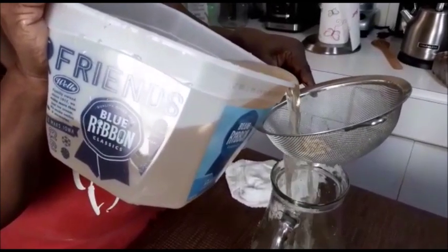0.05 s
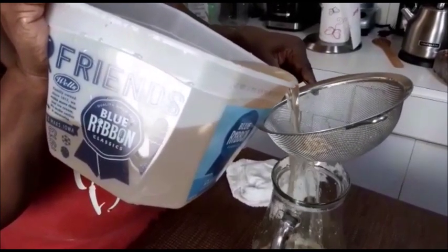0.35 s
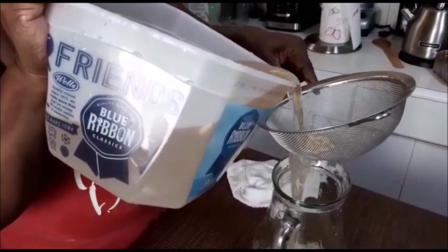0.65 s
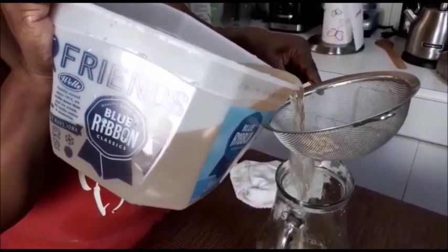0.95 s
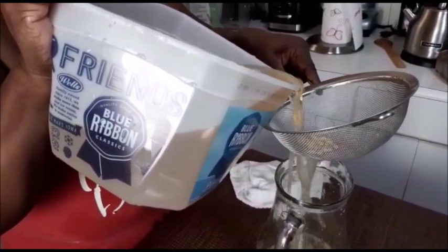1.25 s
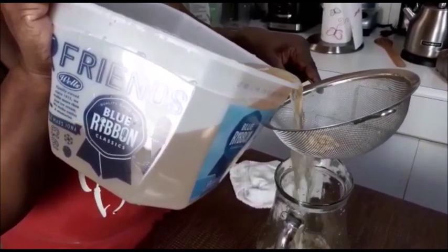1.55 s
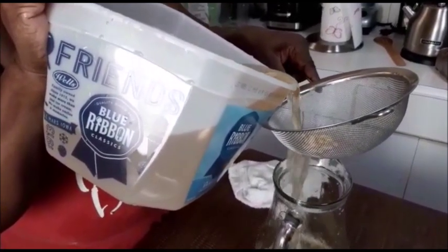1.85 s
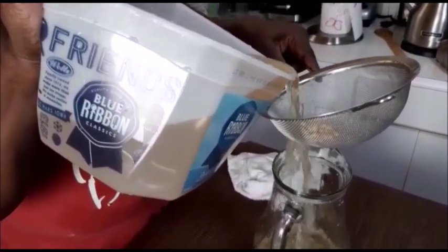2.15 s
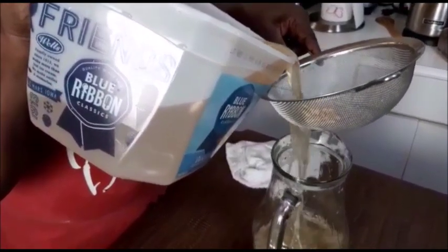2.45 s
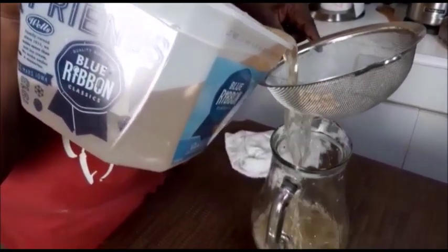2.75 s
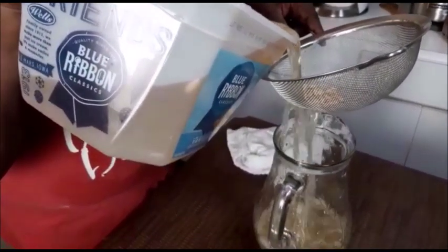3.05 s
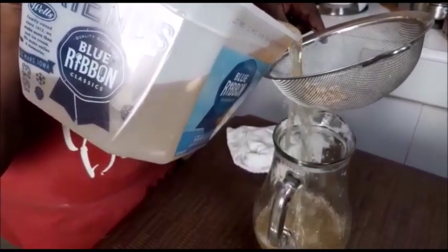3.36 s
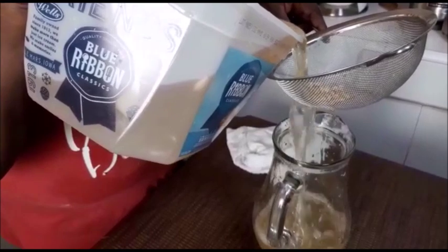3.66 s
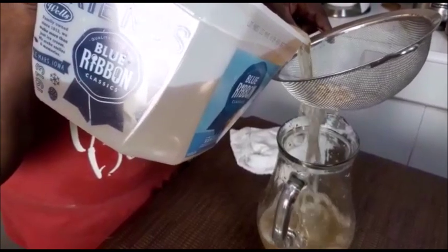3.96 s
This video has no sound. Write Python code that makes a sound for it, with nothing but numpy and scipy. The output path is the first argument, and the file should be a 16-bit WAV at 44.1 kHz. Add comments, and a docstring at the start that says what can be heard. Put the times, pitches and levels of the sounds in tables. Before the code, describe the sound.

Liquid pours through a wire strainer, splashing and gurgling into a glass pitcher.

```python
"""A drink is poured through a wire strainer into a glass pitcher in a quiet kitchen.
From the start, the uneven stream plunges into the pool: trapped air gulps, bubbles plop and fizz,
and spray spatters on the glass. After about a second the gulps thin out, then the loudest comes
near 1.8 s. They keep coming to the end, shorter and rougher, while the air in the pitcher rings
slowly higher as it fills."""
import sys
import numpy as np
from scipy import signal
from scipy.io import wavfile

SR = 44100
rng = np.random.default_rng(int(sys.argv[2]) if len(sys.argv) > 2 else 0)


def to_wav(s):
    """Save 16-bit WAV."""
    ch = np.atleast_2d(s).T  # columns
    pcm = np.round(np.clip(ch, -1, 1) * 32767)  # PCM
    wavfile.write(sys.argv[1], SR, pcm.astype(np.int16))


N = 176400
TIME = np.arange(N) / SR
LOW_NOTE_PAN_DB, HIGH_NOTE_PAN_DB = 4, -5.5  # the pitcher's two notes; plus means left


# The stream traps a pocket of air: t/s, level/dB
AIR_POCKETS = [(0.15, -20), (0.239, -23), (.319, -26), (0.349, -17), (.436, -28), (.483, -22), (0.521, -19),
               (.608, -30), (.726, -17.5), (.835, -26), (1.028, -21.5), (1.076, -20), (1.108, -28),
               (1.537, -28), (1.818, -13.5), (1.879, -22.5), (1.934, -19), (2.081, -26.5), (2.185, -20.5),
               (2.298, -19.5), (2.347, -19.5), (2.396, -25.5), (2.471, -26), (2.652, -20.5), (2.808, -23),
               (2.853, -20.5), (2.946, -28), (3.015, -25.5), (3.05, -23), (3.13, -23), (3.191, -19.5),
               (3.26, -18.5), (3.391, -22.5), (3.499, -23.5), (3.563, -18.5), (3.741, -23.5),
               (3.826, -20.5), (3.872, -27.5)]

def gulps(swell_s=0.057, first_ring_s=0.24):
    """Each air pocket pumps up the pitcher's low note, then lets it ring out."""
    power = from_db(-38.5 + (TIME - TIME.mean())) ** 2  # small pockets keep the note going in between
    for s, db in AIR_POCKETS:
        since_peak = TIME - s - .013
        ring_s = first_ring_s * np.exp(-0.19 * s)  # shorter as the pitcher fills
        fade_db = -60 * np.maximum(-since_peak / swell_s, since_peak / ring_s)
        power = power + from_db(db + .5 + np.maximum(fade_db, -90)) ** 2
    flutter_db = 1.26 + 0.49 * TIME  # rougher as it fills
    hz = note_pitch(*AIR_NOTES[0][:2]) * (1 + .015 * flutter_db * drift(71))
    delay_s = np.array([[.00007], [0]])  # left ear, right ear
    tone = np.sin(2 * np.pi * (np.cumsum(hz) / SR - hz * delay_s))
    return pan(LOW_NOTE_PAN_DB) * np.sqrt(power) * from_db(flutter_db * drift(80)) * tone


# A cluster of bubbles breaks away: t/s, level/dB, f/Hz
BUBBLE_CLUSTERS = [(0.043, -27.5, 2450), (.226, -23.5, 2700), (.243, -22, 537), (.378, -22.5, 1870),
                   (.401, -21.5, 2670), (.452, -27.5, 775), (.582, -26.5, 1780), (.692, -27, 2190),
                   (.708, -24.5, 1970), (.819, -24, 2900), (.91, -25.5, 2390), (.946, -24, 3490),
                   (.969, -24.5, 1870), (1.162, -24, 2410), (1.212, -24, 2860), (1.497, -30, 2100),
                   (1.538, -23, 505), (1.575, -28.5, 570), (2.183, -29.5, 1870), (2.237, -26.5, 2680),
                   (2.248, -24.5, 1530), (2.258, -22.5, 534), (2.308, -28, 1600), (2.358, -25.5, 567),
                   (3.181, -24, 1050), (3.26, -24.5, 1420), (3.362, -22, 640), (3.613, -28, 700),
                   (3.63, -28, 1680), (3.635, -26, 3790), (3.74, -26.5, 1690)]

def plops(count=9, trail_s=.03, spread_octaves=.4):
    """One bubble leads a short trail of weaker ones, ever sparser and less alike in size."""
    out = np.zeros((2, N))
    for s, db, hz in BUBBLE_CLUSTERS:
        cycles = 25.6 * (hz / 1000) ** 0.65
        for k, (size, pitch, side, jitter) in enumerate(rng.uniform(-0.997, 1, (count, 4))):
            late = max(k + jitter / 2, 0) / count  # 0 leads the trail, 1 ends it
            octaves = spread_octaves * pitch * np.sqrt(late)
            ping = bubble(hz * 2 ** octaves, cycles, lag_s=.00008 * side, pan_db=4 * side)
            gain = from_db(db - 2.5 + 2 * size - 10.5 * late)
            add(out, s + trail_s * late * (1 + late) / 2, gain * ping)
    return out


def bubble(hz, cycles, lag_s, pan_db, glide=0.084):
    """A bubble rings and fades, rising in pitch as it nears the surface."""
    life = cycles / hz
    t = np.arange(int(life * SR) + 2) / SR
    t = np.maximum(t - abs(lag_s) + np.array([[lag_s], [-lag_s]]), 0)  # one ear hears it first
    tone = np.sin(2 * np.pi * hz * t * (1 + glide * t / life))
    loudness = np.exp(-np.log(1000) * t / life) * (1 - np.exp(-2 * hz * t))
    return pan(pan_db) * tone * loudness


# A heavy drop lands: t/s, level/dB
HEAVY_DROPS = [(.247, -30), (.377, -25.5), (.487, -29.5), (.545, -29), (.584, -29), (.727, -32),
               (.825, -34), (1.115, -35), (1.317, -36), (1.372, -35), (1.463, -32.5), (2.021, -32.5),
               (2.649, -35), (3.261, -27), (3.741, -35), (3.806, -35.5)]

def knocks(rise_s=0.0053):
    """A heavy drop makes the pitcher's high note swell and die in a few hundredths of a second."""
    level = 0
    for s, db in HEAVY_DROPS:
        age = np.maximum(TIME - s, 0) / rise_s
        level = level + from_db(db - 0.5) * age * np.exp(1 - np.minimum(age, 20))
    hz = note_pitch(*AIR_NOTES[1][:2]) * (1 + 0.0182 * drift(60.3))
    return pan(HIGH_NOTE_PAN_DB) * level * np.sin(2 * np.pi * np.cumsum(hz) / SR)


# How hard the stream splashes: t/s, level/dB
SPLASH_STRENGTH = [(0, -36.5), (.5, -36.5), (.95, -39), (1.7, -39), (2.12, -43.5), (2.3, -38.5),
                   (2.55, -42), (3.3, -39), (4, -41.5)]
# How loud bubbles are, from big and low to small and high: f/Hz, level/dB
BUBBLE_LEVELS = [(250, 3), (400, -4), (700, -1), (1050, -6.5), (1500, -3), (2900, -0.5), (3800, -8),
                 (5500, -6)]

def bubble_swarm(count=3000):
    """Bubbles of all sizes ring in the pool, louder when the stream splashes harder."""
    out, chance, quirks = np.zeros((2, N)), rng.random((count, 3)), rng.standard_normal((count, 3))
    s = chance[:, 0] * N / SR
    hz = 240 * (5500 / 240) ** (chance[:, 1] ** .6)
    strength = np.minimum(-np.log(1 - chance[:, 2]), 3.3)  # most are weak
    db = at_hz(BUBBLE_LEVELS, hz) + 3.5 * strength + 1.5 * np.interp(s, TIME, drift(10.7))
    for k, (ring, lag, side) in enumerate(quirks):
        cycles = 28.4 * np.exp(.3 * ring) * np.sqrt(hz[k] / 1000)
        ping = bubble(hz[k], cycles, lag_s=.00008 * (lag - .5), pan_db=2 * side)
        add(out, s[k], from_db(db[k]) * ping)
    return unit_power(out) * from_db(at_time(SPLASH_STRENGTH, TIME) - 2)


# The low and high notes of the air in the pitcher: starting f/Hz, climb/(Hz/s), width/Hz, level/dB
AIR_NOTES = [(305.6, 9.6, 24, -41), (1274, 47, 51, -52.5)]

def pitcher_air():
    """Drops drum on the air: the low note grows as the pool deepens, the high one follows the splash."""
    out, splash_db = 0, at_time(SPLASH_STRENGTH, TIME)
    low_gain = from_db(TIME - TIME.mean()) * pan(LOW_NOTE_PAN_DB)  # 1 dB louder each second
    high_gain = from_db(0.95 * (splash_db - splash_db.mean())) * pan(HIGH_NOTE_PAN_DB)
    for (hz, climb, width, db), gain in zip(AIR_NOTES, (low_gain, high_gain)):
        note = np.exp(2j * np.pi * np.cumsum(note_pitch(hz, climb)) / SR)
        hits = drops(900, 1.9) * (rng.standard_normal(N) + 0.59 * rng.standard_normal((2, N)))
        # every hit rings on at the rising pitch
        ringing = note * signal.lfilter([1], [1, -np.exp(-np.pi * width / SR)], hits / note)
        near_note = signal.butter(1, [hz / 2, hz * 2], "band", fs=SR, output="sos")
        out = out + from_db(db) * gain * signal.sosfilt(near_note, unit_power(ringing.real))
    return out


def note_pitch(start_hz, climb, curve_s=5.4):
    """Filling raises the air's pitch, faster and faster because the neck narrows."""
    return start_hz + climb * TIME * (1 + TIME / curve_s) / 2


# How strong the fine spray is: t/s, level/dB
SPRAY_STRENGTH = [(0, -38), (.6, -41), (.98, -40.5), (1.13, -45.5), (1.35, -40.5), (2.13, -42), (2.33, -40),
                  (2.55, -44), (3.25, -41), (4, -42)]
# Spray bursts on the mesh and glass: t/s, level/dB, fade time/s
SPRAY_BURSTS = [(.045, -36, 0.025), (.233, -36, 0.014), (.395, -32.5, 0.013), (.529, -31.5, 0.0038),
                (.582, -32, 0.0072), (.812, -43.5, .023), (1.207, -42, 0.039), (1.26, -41, 0.036),
                (1.313, -40, 0.025), (1.498, -32, .0051), (1.594, -32.5, 0.0037), (1.932, -39.5, .012),
                (1.995, -31, 0.0044), (2.166, -36, 0.0042), (2.365, -39, 0.035), (2.649, -39, .011),
                (3.234, -36, 0.011), (3.412, -35, 0.0051), (3.806, -35, .006)]
# The spray's mix of low and high sound: f/Hz, level/dB
SPRAY_TONE = [(1500, 1.5), (2800, 1.5), (4200, -2.2), (5500, 2.7), (7000, -3), (8700, 1.4), (15500, 1)]
# Which side the spray leans to: f/Hz, left minus right/dB
SPRAY_SIDES = [(3500, 2), (5300, -3.5), (7200, -5.5), (9000, 1.5), (15000, -2)]

def spray(rise_s=0.00076, tick_s=0.0011, mist=0.55):
    """Fine droplets tick all the time and come in sudden bursts."""
    power = from_db(at_time(SPRAY_STRENGTH, TIME) + 2.95 * drift(48)) ** 2
    for s, db, fade_s in SPRAY_BURSTS:
        t = np.maximum(TIME - s + rise_s, 0)
        burst = (1 - np.exp(-t / rise_s)) * np.exp(-t / fade_s)
        power = power + (from_db(db + 9.5) * burst) ** 2
    hits = drops(per_s=1800, spread_db=4)
    ticks = signal.lfilter([1], [1, -np.exp(-1 / (tick_s * SR))], hits ** 2 + 1e-18)
    strength = np.sqrt(power * (ticks / ticks.mean() + mist ** 2))
    return np.sqrt(power.mean()) * shaped_noise(strength, SPRAY_TONE, SPRAY_SIDES, flicker_db=2.5)


def fizz(count=3600):
    """Tiny bubbles burst in the foam, each a brief high ping."""
    out = np.zeros((2, N))
    for when, pitch, chance, place in rng.random((count, 4)):
        side = 2 * place - 1
        strength = min(-np.log(1 - chance), 3)
        hz = 3500 * (15000 / 3500) ** np.sqrt(pitch)
        ping = bubble(hz, cycles=41, lag_s=.00008 * side, pan_db=6 * side)
        add(out, when * N / SR, from_db(4.5 * strength) * ping)
    return unit_power(out) * from_db(at_time(SPRAY_STRENGTH, TIME) - 6)


# The patter's mix of low and high sound: f/Hz, level/dB
PATTER_TONE = [(200, 4), (530, 12), (1100, 1.5), (4200, -6.5), (15000, -30)]

def patter():
    """The stream hits the pool as thousands of drops that blur together."""
    noise = shaped_noise(drops(per_s=3000, spread_db=3.1), PATTER_TONE, flicker_db=3.0)
    return from_db(at_time(SPLASH_STRENGTH, TIME) - 7.5) * noise


def kitchen_echo(sound, ring_s=0.23, dull_hz=17400):
    """The counter and walls throw back a short, slightly dull echo."""
    t = TIME[:SR // 2]
    tail = rng.standard_normal((2, len(t))) * np.exp(-np.log(1000) * t / ring_s) * (t > .003)
    tail /= np.sqrt(np.sum(tail ** 2) / 2)
    tail = signal.sosfilt(signal.butter(1, dull_hz, fs=SR, output="sos"), tail)
    return from_db(-5) * signal.fftconvolve(sound, tail, axes=1)[:, :N]


# The quiet kitchen's own sound: f/Hz, level/dB
RUMBLE_TONE = [(25, -29), (48, -10), (80, -10), (105, 1), (150, -2.5), (220, -11), (500, -17.5)]

def room_rumble():
    """A faint, steady, low noise fills the room."""
    return from_db(-48) * shaped_noise(1, RUMBLE_TONE)


# How alike noise is in the two ears: f/Hz, likeness (1 = the same)
EAR_LIKENESS = [(250, 0.92), (700, .7), (1500, 1), (3000, 0.55), (5000, -.28)]

def shaped_noise(strength, tone, sides=None, flicker_db=0):
    """Stereo noise of power 1 that follows `strength`, built band by band from low to high."""
    out, edges = 0, np.geomspace(22, 17000, 28)
    hiss = rng.standard_normal((3, 2, N)) * strength + 1e-18
    for k, (low, high) in enumerate(zip(edges, edges[1:])):
        hz = np.sqrt(low * high)
        if tone[0][0] / 2 < hz < tone[-1][0] * 2:
            band = signal.butter(2, [low, high], "band", fs=SR, output="sos")
            middle, side = signal.sosfilt(band, hiss[k % len(hiss)])
            alike = at_hz(EAR_LIKENESS, hz)
            stereo = np.sqrt(1 + alike) * middle + np.sqrt(1 - alike) * side * [[1], [-1]]
            gain = from_db(at_hz(tone, hz) + flicker_db * drift(33.0))
            out = out + gain * (pan(at_hz(sides, hz)) if sides else 1) * stereo
    return unit_power(out)


def drops(per_s, spread_db):
    """Random hits, mostly small, a few large."""
    sizes = from_db(spread_db * np.minimum(rng.exponential(1, N), 5))
    return unit_power(sizes * (rng.random(N) < per_s / SR))


def drift(rate_hz):
    """A smooth random wobble, about 1 in size."""
    r = np.exp(-80 * np.pi * rate_hz / SR)
    slow = signal.lfilter([1], [1, -2 * r, r * r], rng.standard_normal(N // 40 + 2002))[2000:]
    return np.interp(np.arange(N) / 40, np.arange(len(slow)), unit_power(slow))


def from_db(db):
    """Turn decibels into a multiplier."""
    return 10 ** (np.asarray(db) / 20)


def unit_power(x):
    """Scale to an average power of 1."""
    return x / np.sqrt(np.mean(x ** 2) + 1e-20)


def at_time(rows, s):
    """Read a table at given times."""
    return np.interp(s, *np.transpose(rows))


def at_hz(rows, hz):
    """Read a table at given pitches, with octaves evenly spaced."""
    f, value = np.transpose(rows)
    return np.interp(np.log(hz), np.log(f), value)


def pan(db):
    """Multipliers that make the left ear `db` louder than the right."""
    return from_db(np.array([[.5], [-.5]]) * db)


def add(out, s, sound):
    """Mix a stereo sound in at a time."""
    i = int(np.clip(s * SR, 0, N - 1))
    out[:, i:i + sound.shape[1]] += sound[:, :N - i]


def scene():
    """The pour, its echo and the room behind it."""
    hollow = gulps()
    splashing = plops() + knocks() + bubble_swarm() + pitcher_air() + spray() + fizz() + patter()
    return hollow + splashing + kitchen_echo(splashing + 0.49 * hollow) + room_rumble()


def record(dry):
    """Sound above 15900 Hz is cut away sharply."""
    return signal.sosfilt(signal.ellip(12, .1, 80, 15900, fs=SR, output="sos"), dry)


dry = scene()
out = record(dry)
to_wav(out)
```